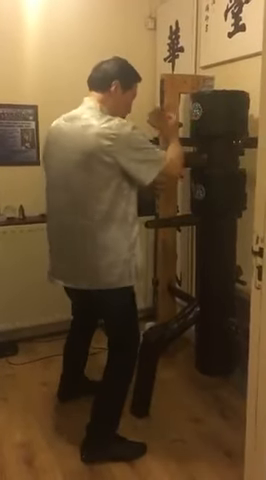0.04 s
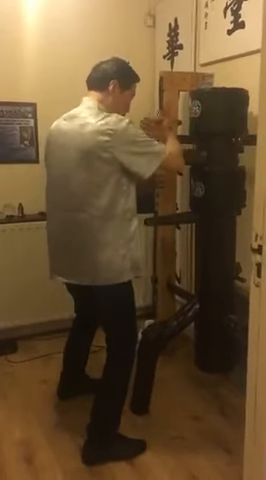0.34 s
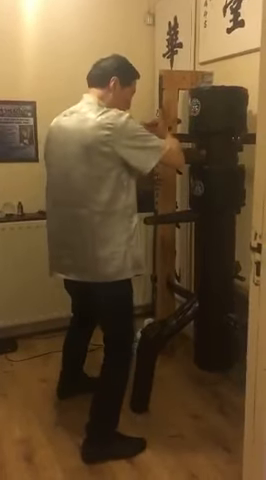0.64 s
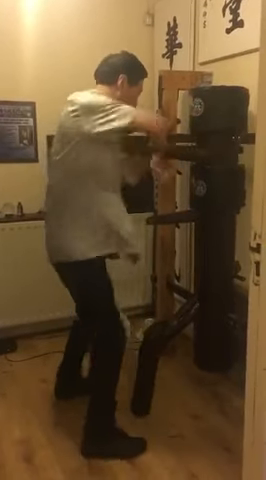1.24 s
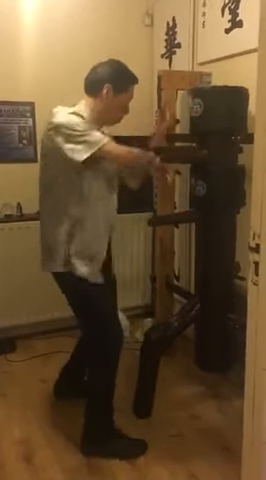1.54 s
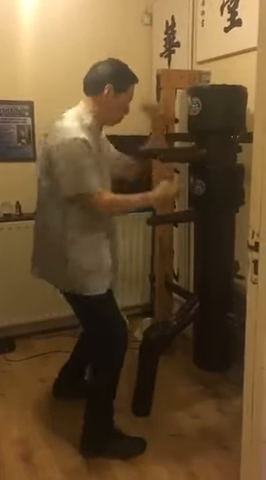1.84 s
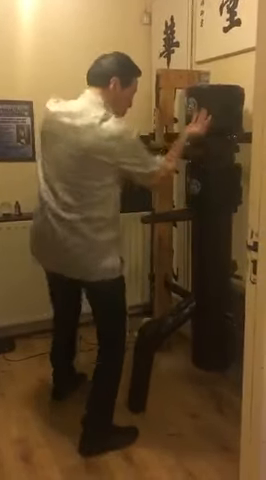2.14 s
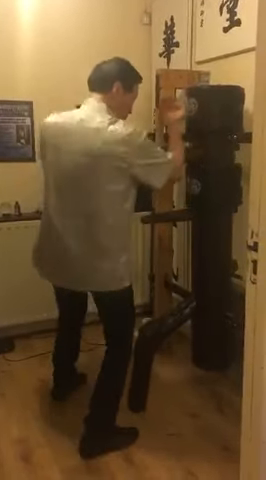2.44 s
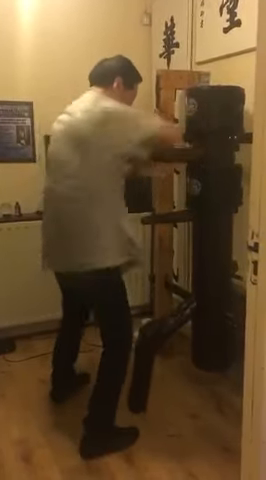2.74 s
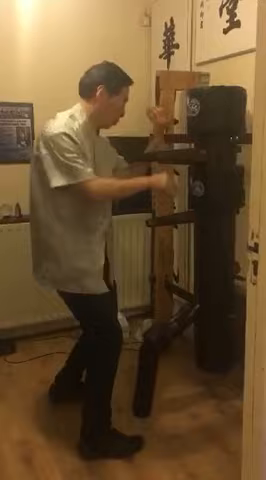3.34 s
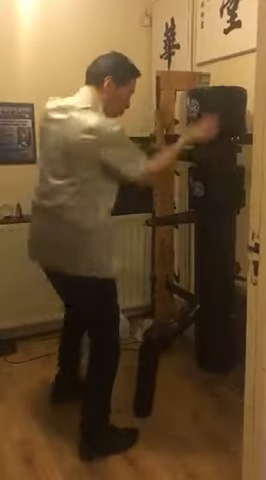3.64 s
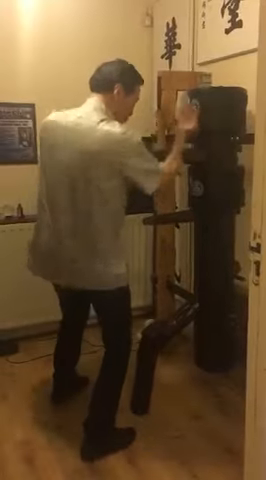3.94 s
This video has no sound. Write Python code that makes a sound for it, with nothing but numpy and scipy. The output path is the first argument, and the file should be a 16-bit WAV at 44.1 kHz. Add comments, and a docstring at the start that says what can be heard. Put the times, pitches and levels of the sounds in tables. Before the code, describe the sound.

A wooden practice dummy clacks and briefly rings under four bursts of hand strikes, heard from nearby in a small room. The start is hushed; then cloth swishes, dull thuds and wooden chatter fill the gaps between blows.

```python
"""In a small, echoing room, forearms and palms strike a wooden training dummy.
Each blow is a quick cluster of knocks: skin slaps, the loose wooden arms clack in their sockets
and the trunk rings. Between blows the arms rattle, the frame and the floor thud under the
shifting weight, and sleeves swish. A low hush lies under it all."""
import sys
import numpy as np
from scipy import signal
from scipy.fft import rfft, irfft, next_fast_len
from scipy.io import wavfile

SR = 44100
rng = np.random.default_rng(int(sys.argv[2]) if len(sys.argv) > 2 else 0)


def file_out(sig):
    """Save sig as 16-bit WAV at sys.argv[1]."""
    # one column per channel
    cols = np.atleast_2d(sig).T
    # limit, then scale
    lim = np.clip(cols, -1, 1)
    pcm = np.round(lim * 32767).astype(np.int16)
    wavfile.write(sys.argv[1], SR, pcm)


N = 176400
T = np.arange(N) / SR

# Weight landing on the frame and floor: start_s, level_db, pitch_hz
WEIGHT_THUDS = [(0.0, -45.5, 58.2), (0.354, -52.5, 179), (0.359, -68.5, 350), (1.300, -30, 73),
                (1.374, -31, 59.8), (1.525, -38, 218), (1.55, -41.5, 152), (1.622, -42.5, 62),
                (1.741, -50, 61), (1.746, -40, 219.8), (1.91, -55, 58), (2.042, -53, 55.3),
                (2.111, -32.5, 77), (2.255, -22.5, 63.7), (2.268, -32.5, 147.3), (2.281, -29.5, 108.6),
                (2.448, -40.5, 74.8), (2.78, -49, 60.5), (2.868, -27, 73), (2.916, -21, 60),
                (3.172, -40.5, 62.6), (3.252, -40.5, 53.7), (3.373, -39.5, 59), (3.529, -47.5, 258.6),
                (3.543, -33, 61.6), (3.599, -41, 80.4), (3.729, -32, 89.3), (3.786, -27.5, 55),
                (3.901, -23, 74.5), (3.946, -28.5, 106)]
# Sleeves and soles brushing: start_s, rise_s, fall_s, level_db
CLOTH_SWISHES = [(0.0, 0.0013, 0.31, -56.5), (0.35, .01, 0.02, -65), (0.43, 0.016, 0.021, -76.5),
                 (0.78, 0.027, 0.05, -68), (1.13, 0.17, 0.077, -47.5), (1.51, 0.0098, 0.073, -28),
                 (1.73, 0.0047, 0.11, -37), (1.83, 0.25, 0.081, -30.5), (2.21, 0.036, 0.2, -36),
                 (2.705, 0.003, 0.33, -49), (3.07, 0.0074, 0.071, -30.5), (3.29, 0.0096, 0.058, -42),
                 (3.505, 0.01, 0.017, -39.5), (3.60, 0.097, 0.019, -42), (3.92, 0.021, 0.044, -29.5)]
# Hits on the dummy: start_s, level_db, clack_hz, clack_db, slap_db, trunk_db, tilt_db_per_octave
# The clack, slap and trunk levels add to level_db. A harder hit has more tilt and sounds brighter.
HITS = [(0.131, -57.5, 2230, 2.5, -0.5, 7, -1), (1.265, -25, 1550, -7, -20, 1, 0),
        (1.277, -15, 1273, 3, -2, -9.5, -2), (1.286, -15, 940, 1, -5.5, -2.5, -1),
        (1.304, -20, 1144, 3.5, -18, -1.5, -3), (1.390, -22, 1107, -1.5, -30, -18, -3),
        (1.524, -32.5, 1310, -20, -13, 5, -2), (1.748, -42, 1476, -11, -25, 12, 3),
        (1.915, -31, 1640, 9, -25, -18, -5), (1.937, -17, 1430, -1, -34, -23, 3.5),
        (1.945, -34.5, 642, 12, -34, -30, -1), (2.053, -15, 832, 1.5, -4.5, 3.5, -2.5),
        (2.061, -11, 1397, 3, -7, -17, 4.5), (2.086, -11.5, 2580, -8.5, -13.5, -6.5, 2),
        (2.294, -30.5, 2040, -7.5, -12, -17, 1.5), (2.825, -27, 1910, -11, -11, -11, 2),
        (2.838, -15, 899, 5.5, -7.5, -11.5, -2), (2.855, -15, 2122, -8, -3.5, 4, 1.5),
        (2.870, -16, 796, 1, -16, -3.5, 0), (2.888, -15.5, 1252, -6.5, -20.5, 1.5, -1.5),
        (3.688, -15, 2238, 1, -2, -18, 3.5), (3.696, -14, 6300, -6.5, -5.5, -5, 1.5),
        (3.714, -10, 958, -5, -18, -10, 2.5), (3.730, -13.5, 737, 1, -34, -6.5, 0.5),
        (3.737, -24, 2530, -3, -24, 2, -1), (3.750, -15.5, 798, -4, -32, -8, -0.5)]
# Lasting notes of the trunk and of the wooden arms: pitch_hz, level_db, fade_s
TRUNK_NOTES = [(163.5, -13.5, 0.64), (182, -4, 0.66), (225.1, -7, 0.96), (281, 4.5, 0.29),
               (303.7, -2, 0.43), (356.3, -3, 0.6)]
ARM_NOTES = [(596, -7.5, 0.35), (706.5, 0, 0.44), (730, 1, 0.15), (909, -10, 0.36), (1025.4, 2, 0.39),
             (1061, -2.5, 0.59), (1320, -4, 0.2), (1482, -4.5, 0.47), (1540, 0, 0.33), (1700, -9.5, 0.5),
             (2275, -5.5, 0.47), (2510, -10, 0.27), (6230, -13.5, 0.12)]
# A forearm pushing a loose arm across its socket as a blow lands: start_s, rise_s, level_db
ARM_PUSHES = [(1.267, 0.01, -14.5), (2.027, 0.026, -7.5), (2.825, 0.016, -6.5)]
# The arms bouncing back and chattering: start_s, fall_s, level_db
ARM_BOUNCES = [(2.461, 0.038, -23.5), (2.513, 0.023, -24), (2.558, 0.052, -31), (2.625, 0.041, -36.5),
               (2.686, 0.015, -31), (3.254, 0.011, -22.5), (3.352, 0.0076, -26.5), (3.375, 0.0055, -32.5),
               (3.92, 0.2, -30)]
# The tone colour of each sound, from bass to treble: frequency_hz, level_db
HUSH_COLOUR = [(20, -16), (55, 3.5), (110, -5.5), (200, -6), (320, -13.5), (450, -23.5), (1000, -28),
               (2500, -39), (6500, -37.5), (8000, -40.5)]
FLOOR_COLOUR = [(20, -23), (40, -16), (60, 0), (110, -6), (170, -11), (320, -21.5), (600, -38.5),
                (3000, -90.5)]
CLOTH_COLOUR = [(150, 14.5), (450, -1.5), (1000, 4.5), (2200, 0.5), (3000, -4.5), (5000, -9), (6400, -7.5),
                (8000, -20.5)]
WOOD_COLOUR = [(100, -32), (200, -10.5), (300, -3), (450, -15.5), (580, 0.5), (730, -4), (1100, -3),
               (1650, -1.5), (2100, -7.5), (2580, -9), (2900, -19), (4400, -23.5), (8000, -40.5)]
SKIN_COLOUR = [(300, -39.5), (1200, 11), (2500, -18.5), (3000, -3.5), (3700, 3), (5000, -7.5), (6300, 3.5),
               (7200, -1), (8000, -14)]
RATTLE_COLOUR = [(150, -0.5), (300, 7.5), (440, -21.5), (600, 9), (900, 5.5), (1200, -2.5), (1480, 9.5),
                 (1900, -6.5), (2400, -11.5), (3200, -19.5), (8000, -38)]
# How long the room echoes: frequency_hz, fade_s
ROOM_FADES = [(100, 0.36), (260, 1), (700, 0.63), (1800, 0.6), (4000, 0.54), (8000, 0.56)]
# A treble cut that softens the splash of rounded peaks: frequency_hz, level_db
TREBLE_CUT = [(7900, 0), (9000, -6)]

ARM_COUNT = 3
DIRECT_DB, EARLY_ECHO_DB, LATE_ECHO_DB = -6.5, -3.5, -7.5
CLACK_PITCH_DROP, CLACK_SETTLE_S = 0.17, 0.012  # the drop is a share of the starting pitch
TOUCHES_PER_S, TOUCH_SPREAD_DB = 900, 5
LIMIT_DB, LIMIT_ATTACK_S, LIMIT_RECOVERY_DB_PER_S = 4.5, 0.0005, 105.5


def from_db(db):
    """Turn decibels into a number to multiply by."""
    return 10 ** (np.asarray(db) / 20)


def unit_power(x):
    """Scale a sound so its average power is 1."""
    return x / np.sqrt(np.mean(x ** 2) + 1e-20)


def unit_energy(x):
    """Scale a sound so its total energy is 1."""
    return x / np.sqrt(np.sum(x ** 2) + 1e-20)


def look_up(table, hz):
    """Read between a table's rows, with octaves evenly spaced."""
    frequencies, values = np.transpose(table)
    return np.interp(np.log(np.maximum(hz, 1)), np.log(frequencies), values)


def fade(fade_s, size=SR):
    """A level that falls by 60 dB in fade_s."""
    return np.exp(-np.log(1000) * T[:size] / fade_s)


def rise(rise_s, size=SR):
    """A soft start, from 0 up towards 1."""
    return 1 - np.exp(-T[:size] / rise_s)


def tone(hz, fade_s):
    """One pure note dying away."""
    return np.sin(2 * np.pi * hz * T[:SR]) * fade(fade_s)


def colour(x, table):
    """Give a sound the tone colour in a table."""
    n = next_fast_len(len(x) + SR // 10, True)
    gains = from_db(look_up(table, np.arange(n // 2 + 1) * SR / n))
    cepstrum = irfft(np.log(gains), n)
    cepstrum[1:n // 2] *= 2  # folded so the filter rings only after a sound, never before
    cepstrum[n // 2 + 1:] = 0
    return irfft(rfft(x, n) * np.exp(rfft(cepstrum)), n)[:len(x)]


def add(track, start_s, sound):
    """Mix a sound into a track."""
    i = int(start_s * SR)
    track[i:i + len(sound)] += sound[:N - i]


def swell(start_s, rise_s, fall_s, db):
    """A level that climbs evenly, then dies away."""
    climb = np.clip((T - start_s) / rise_s, 0, 1)
    return from_db(db) * climb * np.exp(-np.maximum(T - start_s - rise_s, 0) / fall_s)


def in_room(x):
    """Near walls add quick echoes and a longer tail. Each call is a new spot in the room."""
    edges_hz = np.geomspace(40, 12000, 12)
    noise, late = rng.standard_normal((2, SR)), 0
    for k, (low, high) in enumerate(zip(edges_hz, edges_hz[1:])):
        band = signal.sosfilt(signal.butter(2, [low, high], "band", fs=SR, output="sos"), noise[k % 2])
        late = late + band * fade(look_up(ROOM_FADES, np.sqrt(low * high)))
    build_up = np.minimum(T[:SR] / 0.0045, 1)
    early = rng.standard_normal(SR) * fade(0.32)
    room = from_db(LATE_ECHO_DB) * unit_energy(late * build_up)
    room += from_db(EARLY_ECHO_DB) * unit_energy(early * build_up)
    room[0] += from_db(DIRECT_DB)
    return signal.fftconvolve(x, room)[:N]


def room_hush():
    """The room's faint, low, steady noise."""
    return from_db(-55.5) * unit_power(colour(rng.standard_normal(N), HUSH_COLOUR))


def floor_thuds():
    """Shifting weight rings one low note of the frame or floor over a dull rumble."""
    track = np.zeros(N)
    for start_s, db, hz in WEIGHT_THUDS:
        rumble = from_db(3) * unit_power(colour(rng.standard_normal(SR), FLOOR_COLOUR)) * fade(0.56)
        note = from_db(11.5) * tone(hz, fade_s=0.28)
        add(track, start_s, from_db(db) * rise(0.0035) * (note + rumble))
    return track


def sleeves():
    """Cloth brushes as the body turns."""
    level = sum(swell(*row) for row in CLOTH_SWISHES)
    return level * unit_power(colour(rng.standard_normal(N), CLOTH_COLOUR))


def impact(table, size, rise_s, fade_s):
    """Struck wood or skin gives a short burst of noise."""
    burst = rng.standard_normal(size) * rise(rise_s, size) * fade(fade_s, size)
    return unit_energy(colour(burst, table))


def clack(hz, size):
    """A wooden arm hits its socket; the note drops as the arm settles."""
    pitch_hz = hz * (1 - CLACK_PITCH_DROP * rise(CLACK_SETTLE_S, size))
    note = np.sin(2 * np.pi * np.cumsum(pitch_hz) / SR)
    return unit_energy(note * rise(0.0028, size) * fade(0.042, size))


def knocks():
    """Each hit is a knock of wood, a slap of skin and a clack. The three arms take turns."""
    arms, echo_free = np.zeros((ARM_COUNT, N)), np.zeros(N)
    size = SR // 10
    for k, (start_s, db, hz, clack_db, slap_db, _, tilt) in enumerate(HITS):
        tilted_wood = [(f, level + tilt * np.log2(f / hz)) for f, level in WOOD_COLOUR]
        wood = impact(tilted_wood, size, rise_s=0.0013, fade_s=0.026)
        slap = from_db(slap_db - 1) * impact(SKIN_COLOUR, size, rise_s=0.0063, fade_s=0.032)
        note = from_db(clack_db) * clack(hz, size)
        strength = from_db(db) * np.sqrt(SR * 0.04)  # the energy of 0.04 s at this level
        add(arms[k % ARM_COUNT], start_s, strength * (wood + slap + from_db(-5) * note))
        add(echo_free, start_s, strength * from_db(-4.5) * note)  # makes the clack sound closer
    return from_db(DIRECT_DB) * echo_free + sum(in_room(arm) for arm in arms)


def wood_ringing(notes, levels_db, rise_s):
    """Every hit sets the wood's own notes ringing, each with a random strength."""
    track = np.zeros(N)
    rings = np.array([from_db(db) * tone(hz, fade_s) for hz, db, fade_s in notes]) * rise(rise_s)
    for (start_s, *_), db in zip(HITS, levels_db):
        scatter, direction = rng.standard_normal((2, len(notes)))
        strengths = from_db(db + 3 * scatter) * np.sign(direction)
        add(track, start_s, strengths @ rings)
    return track


def arm_rattles():
    """A loose arm touches its socket many times as it is pushed in or bounces back."""
    touches = rng.random(N) < TOUCHES_PER_S / SR
    clicks = touches * from_db(TOUCH_SPREAD_DB * rng.standard_normal(N)) * rng.choice([-1, 1], N)
    pushes = sum(swell(start_s, rise_s, 0.0061, db) for start_s, rise_s, db in ARM_PUSHES)
    bounces = sum(swell(start_s, 0.0035, fall_s, db) for start_s, fall_s, db in ARM_BOUNCES)
    scrape = pushes * unit_power(colour(clicks, WOOD_COLOUR))
    chatter = bounces * unit_power(colour(clicks, RATTLE_COLOUR))
    return scrape + chatter


def limiter(x):
    """Turn loud peaks down quickly, then let the level come back slowly."""
    excess_db = np.maximum(20 * np.log10(np.abs(x) + 1e-9) - LIMIT_DB, 0)
    recovery_db = LIMIT_RECOVERY_DB_PER_S * T
    cut_db = np.maximum.accumulate(excess_db + recovery_db, axis=-1) - recovery_db
    smoothing = np.exp(-1 / (LIMIT_ATTACK_S * SR))
    return x * from_db(-signal.lfilter([1 - smoothing], [1, -smoothing], cut_db))


def scene():
    """Mix the room, the person and the dummy into one channel."""
    hush = room_hush()
    echoing = in_room(sleeves() + arm_rattles()) + knocks()
    _, hit_db, _, _, _, trunk_db, _ = np.transpose(HITS)
    trunk = wood_ringing(TRUNK_NOTES, hit_db + trunk_db - 8, rise_s=0.0045)
    arms = wood_ringing(ARM_NOTES, hit_db - 10, rise_s=0.00098)
    return (hush + floor_thuds() + echoing + trunk + arms)[None]


def record(dry):
    """Hold down the blows, cut the high treble and round off the tallest peaks."""
    dulled = signal.sosfilt(signal.cheby1(14, 0.3, 7900, fs=SR, output="sos"), limiter(dry))
    clipped = np.clip(dulled, -0.98, 0.98)
    rounded = clipped + 0.02 * np.tanh((dulled - clipped) / 0.02)  # spills a little new treble
    softened = colour(rounded[0], TREBLE_CUT)[None]
    return signal.sosfilt(signal.cheby1(12, 0.3, 16000, fs=SR, output="sos"), softened)


dry = scene()
out = record(dry)
file_out(out)
```